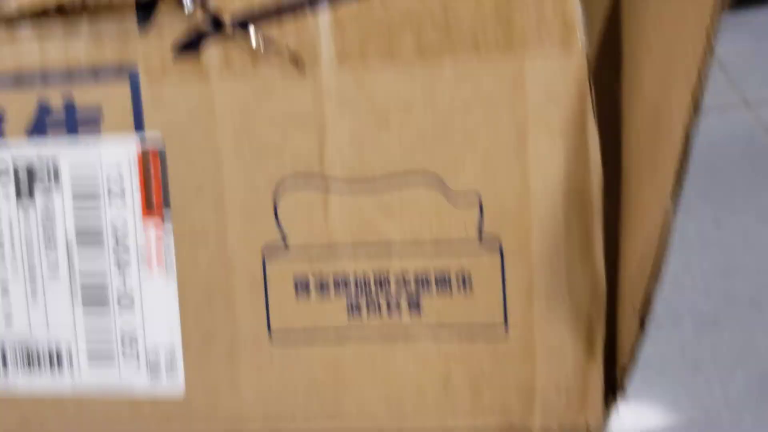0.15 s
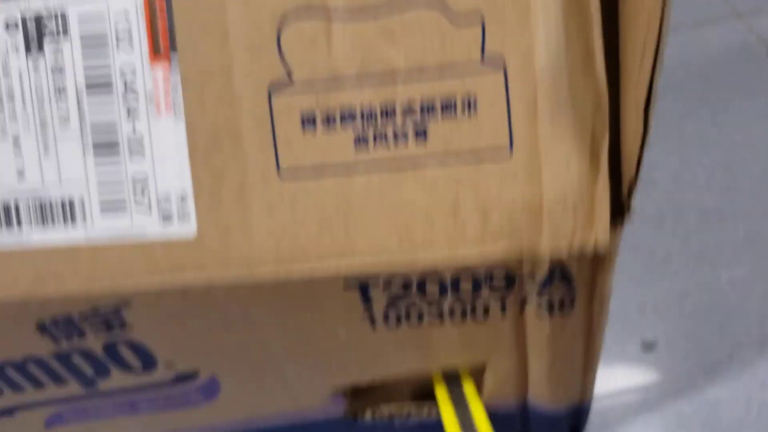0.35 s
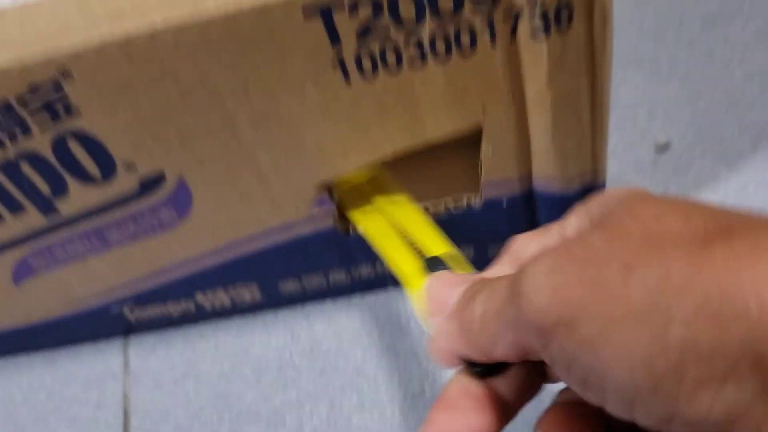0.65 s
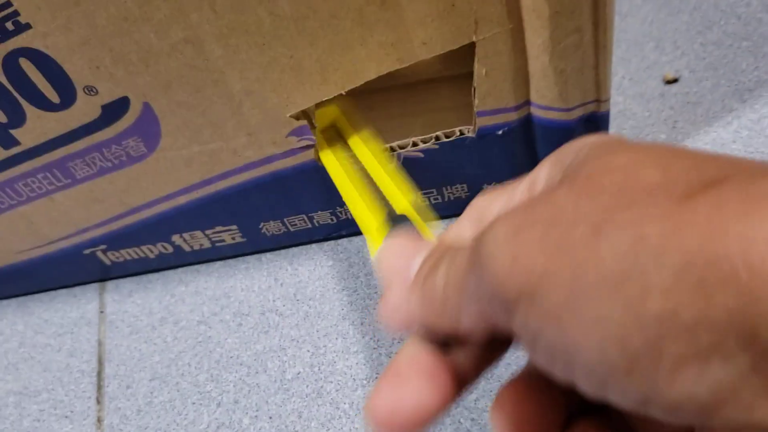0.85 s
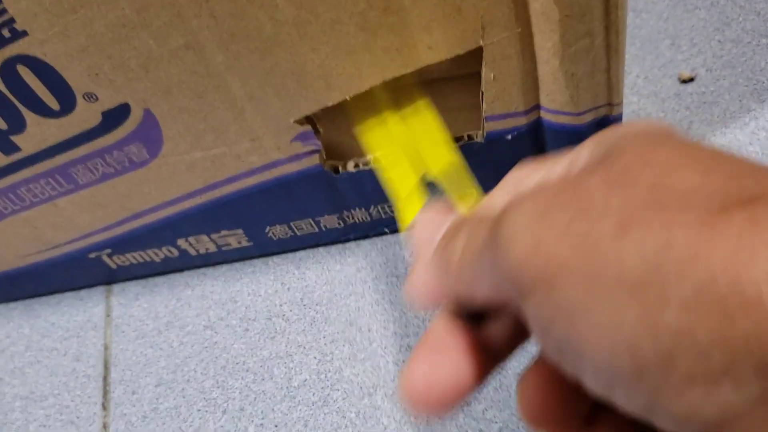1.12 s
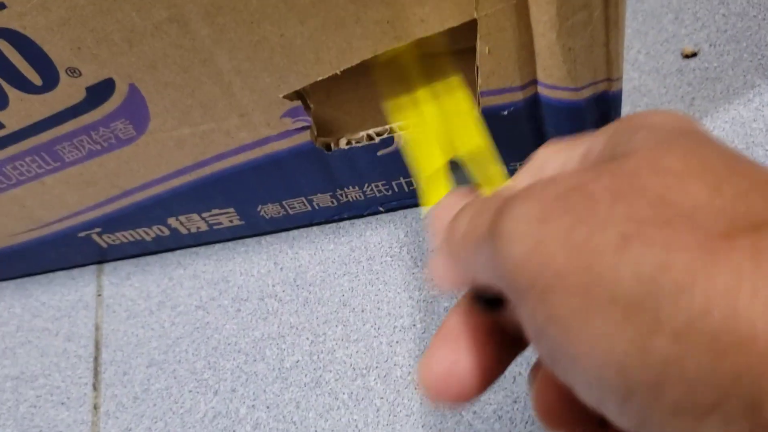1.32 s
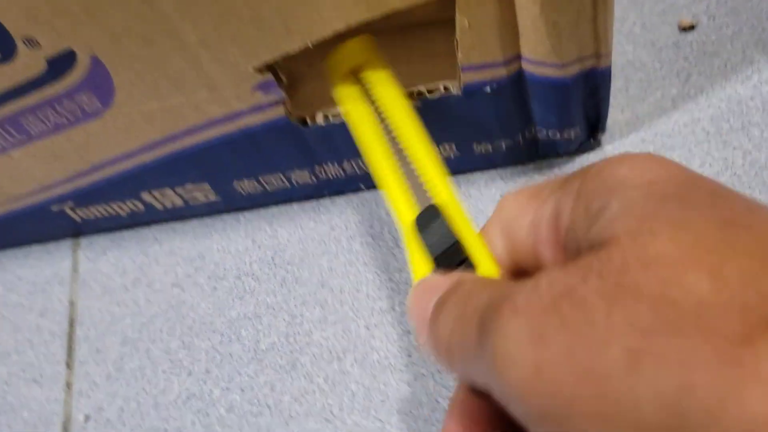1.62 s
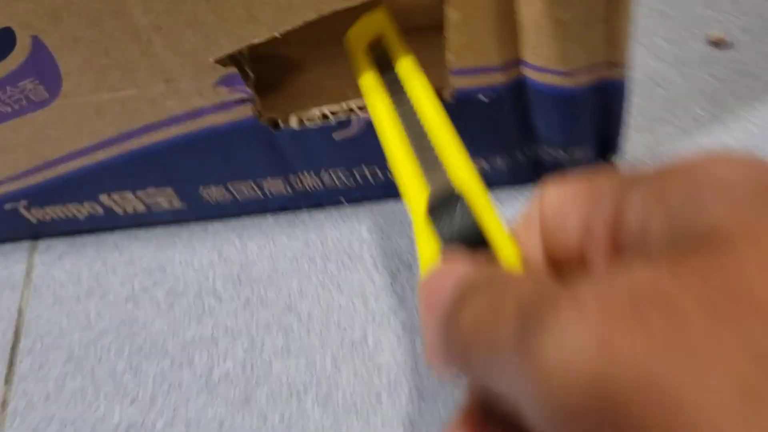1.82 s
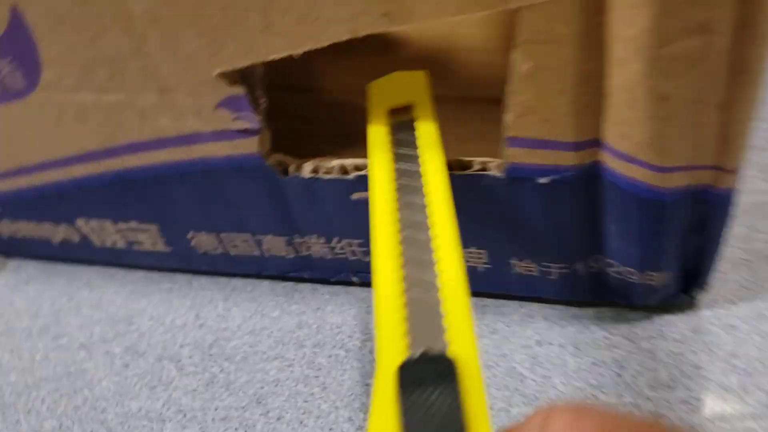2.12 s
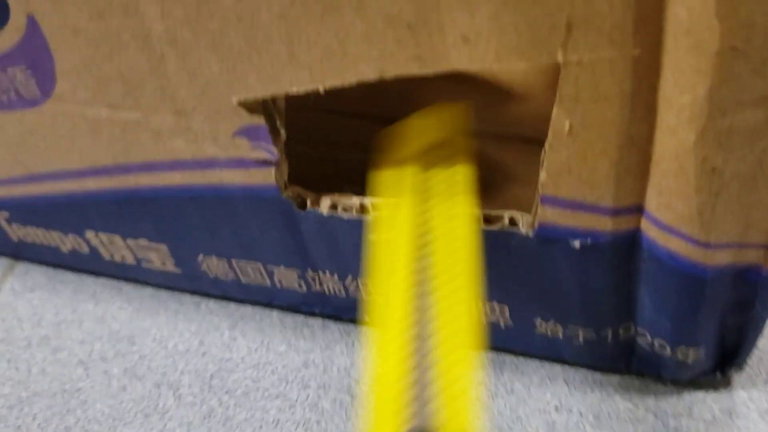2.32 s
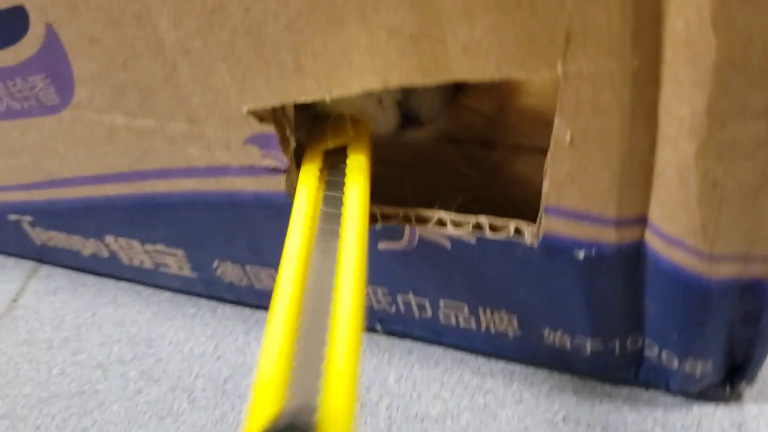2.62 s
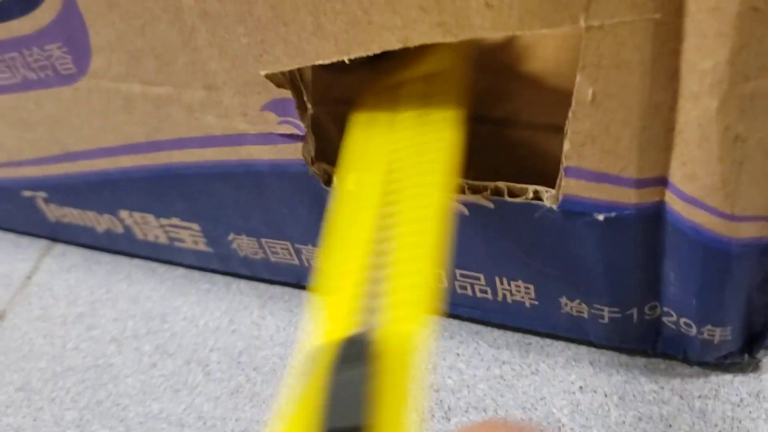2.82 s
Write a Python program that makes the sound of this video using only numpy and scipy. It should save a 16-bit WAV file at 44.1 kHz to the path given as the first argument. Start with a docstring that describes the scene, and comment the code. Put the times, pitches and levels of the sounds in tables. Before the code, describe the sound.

A plastic snap-off knife knocks irregularly on the edges of a hole in a cardboard box, each hollow thud topped by a bright rattling click; low handling rumble early, close phone microphone, small hard-walled room.

```python
"""Plastic knife knocking in a box

A plastic snap-off knife is waved about in a hole cut in a cardboard box and knocks on its edges, near a phone.
Each knock thuds as cavity, panel and edge modes driven by a short push and crushing corrugations.
Loose blade and slider click and chatter: noise bursts and ticks through handle and blade resonances.
A tiled room answers with decaying noise echoes; the moving phone rumbles at first, cardboard shuffles;
a faint hiss lies under it all. The last three are shaped noise."""
import sys
import numpy as np
from scipy import signal
from scipy.fft import rfft, irfft
from scipy.io import wavfile
from scipy.ndimage import uniform_filter1d

SR = 44100
rng = np.random.default_rng(int(sys.argv[2]) if len(sys.argv) > 2 else 0)


def store_pcm(level_fs):
    """Save levels as 16-bit WAV."""
    pcm = np.round(np.clip(level_fs, -1, 1) * 32767).astype(np.int16)
    wavfile.write(sys.argv[1], SR, np.atleast_2d(pcm).T)


N = 130095
PAD = SR // 10  # samples of lead-in, cut off after the echoes are made

# Knocks on the box; parts relative to the knock, before the part trims:
# (time [s], level [dB], cavity [dB], panels [dB], edge [dB],
#  boom pitch [Hz], favoured panel pitch [Hz], favoured edge pitch [Hz])
KNOCKS = [(0.174, -30, -21.5, -16.5, -18, 151, 288, 1060), (0.248, -36, -18, -15.5, -17.5, 171, 248, 705),
          (0.28, -39.5, -14.5, -14.5, -26, 177, 288, 680), (0.38, -33, -17, -11, -11, 166, 347, 840),
          (0.405, -38.5, -7, -12, -14, 148, 284, 643), (0.517, -36.5, -9, -26, -29, 172, 280, 633),
          (0.613, -32.5, -12.5, -8, -13.5, 167.4, 298, 680),
          (0.728, -19.5, -11.5, -16, -22.5, 166.4, 308, 660),
          (0.9165, -36, -0.5, -4.5, -13, 172.3, 306, 735), (0.927, -20.5, -17, -13.5, -32, 159, 326, 680),
          (1.135, -36.5, -8.5, -12, -28, 165, 254, 686), (1.275, -26, -6, -12, -19, 169, 236, 670),
          (1.397, -35, -16.5, -11, -8.5, 187, 310, 765), (1.471, -22.5, -8, -11.5, -19, 161, 227, 675),
          (1.657, -25, -8.5, -12.5, -22, 161.5, 257, 566), (1.677, -27, -8, -9, -22, 162, 310, 687),
          (1.767, -27.5, -14.5, -14.5, -16, 168.4, 300, 676),
          (1.868, -23, -13.5, -16.5, -17, 162.5, 248, 903), (2.117, -20.5, -19, -11.5, -8, 169, 290, 1176),
          (2.185, -36, -11, -18, -33, 137, 326, 1090), (2.281, -31.5, -9, -17.5, -36, 168.5, 240, 1110),
          (2.361, -27, -11, -14.5, -21.5, 155, 257, 630), (2.424, -19.5, -12, -16, -33, 164.2, 276, 1100),
          (2.623, -24.5, -9.5, -12.5, -23, 159.7, 294, 950),
          (2.75, -31.5, -16, -13.5, -22.5, 172.3, 243, 1370)]
# Knock before the start, still dying: columns of KNOCKS after the time
EARLIER_KNOCK = (-25, -17, -13.5, -12.5, 182.5, 320, 881)
# Box modes before retuning, scatter and late damping: (pitch [Hz], relative level [dB], t60 [s])
CAVITY_MODES = [(162.3, 6, 0.25), (181.2, 4, 0.076), (123, -7.5, 0.15)]
PANEL_MODES = [(266.8, 1.5, 0.065), (324.7, 1.5, 0.086), (228.6, -12.5, 0.12), (473, -5, 0.069)]
EDGE_MODES = [(580, -9, .025), (694, -2, .03), (780, -2, .03), (937, -3, .02), (1140, 1, .025),
              (1300, -2, .02), (1450, -4, .02)]
# Clicks of the loose blade and slider, before trim and limits:
# (time [s], peak [dB], handle share [dB], left minus right [dB], chatter [dB], chatter t60 [s])
CLICKS = [(0.1771, -10, -10, 3.5, -27, 0.025), (0.1806, -17, -3, 4, -29, 0.083),
          (0.1872, -28.5, 1, 1, -15.5, 0.23), (0.2842, -33, -3.5, 3, 1, 0.082),
          (0.3815, -11, -8, -1.5, -2, 0.06), (0.3925, -7, -12.5, 2, -12, 0.02),
          (0.531, -29.5, -11, 0, -5, 0.024), (0.6158, -10, -4.5, 2, -4.5, 0.039),
          (0.6253, -34, 7.5, -1, -3, 0.21), (0.7315, -4, -13, 5.5, -21, 0.05),
          (0.7336, -11, -20, -5, -14, 0.05), (0.7445, -19.5, -6.5, -3, -9, 0.067),
          (0.758, -21, -8, 4, -17, 0.046), (0.8217, -26, -3, 0, 1, 0.047),
          (0.827, -19, -18, -4, -28, 0.034), (0.886, -30, -28, 4, -10, 0.023),
          (0.9193, -7.5, -17, 0.5, -7, 0.081), (0.942, -27, -0.5, 3, -3, 0.13),
          (1.0293, -24, -9.5, 1.5, -3, 0.024), (1.1392, -20.5, -13.5, -1.5, 4, 0.028),
          (1.2105, -23, -18, -3.5, -19, 0.04), (1.2765, -16.5, -8.5, 1, -6, 0.061),
          (1.2808, -10.5, -9.5, -3, -9, 0.029), (1.4005, -11, -5, 5.5, -12.5, 0.043),
          (1.4705, -15, 0, 5, -5, 0.12), (1.4758, -10.5, -10, -7, -19, 0.057),
          (1.5815, -41, -9, -5, -6, 0.03), (1.5883, -32, -9, 2, -12, 0.024),
          (1.6588, -10, -7.5, 0.5, -8.5, 0.12), (1.6635, -11.5, -9.5, -1, -24, 0.066),
          (1.7675, -17.5, -2, -5.5, -12.5, 0.036), (1.7722, -4, -11, 0.5, 3, 0.038),
          (1.7817, -18.5, 4, -1.5, -13, 0.06), (1.8745, -18, -6, 2, -16.5, 0.061),
          (1.9026, -25.5, 4, 1, -15.5, 0.067), (2.118, -12.5, -6, 0, -12, 0.081),
          (2.1475, -17, -21, 0, -21, 0.023), (2.2795, -19, -13, 8, 1, 0.025),
          (2.2855, -10, -11.5, -1, -32, 0.017), (2.2882, -10.5, -11, -4, -18, 0.02),
          (2.3612, -17, -10.5, -3.5, 2, 0.048), (2.388, -22.5, 10, 0.5, -5, 0.14),
          (2.4268, -13.5, -9, -1.5, 0, 0.015), (2.545, -32.5, -7, -4, -2, 0.026),
          (2.6277, -9.5, -13, -2.5, -8.5, 0.023), (2.6712, -10.5, -6.5, -0.5, -3, 0.029),
          (2.7528, -22, -12, -2.5, -5, 0.045), (2.7625, -21, -5.5, -1, -26, 0.034)]
# Click before the start, chatter and echo still dying: columns of CLICKS after the time
EARLIER_CLICK = (-8, 2, 2.5, -30, 0.21)
# Knife resonances before scatter: (pitch [Hz], width [Hz], relative level [dB])
HANDLE_MODES = [(4210, 580, -2), (6150, 780, -14), (6897, 1180, 2.5), (1980, 4400, -4.5), (3380, 400, -22),
                (8700, 1500, -5)]
BLADE_MODES = [(10440, 1520, -7), (12585, 900, 7.5), (12130, 2400, -3), (14480, 2320, 4)]
# Handling rumble of the moving phone: (time [s], level [dB])
RUMBLE_LEVEL = [(0.0, -59), (0.31, -56), (0.5, -49), (0.62, -55), (0.8, -56), (1.04, -65.5), (1.58, -62),
                (2.05, -70.5), (2.59, -70), (2.95, -71)]
# Cardboard shuffling while the hand moves: (time [s], level [dB])
SHUFFLE_LEVEL = [(0.0, -42.5), (0.12, -57.5), (0.42, -48), (0.6, -54), (1.22, -63), (1.34, -47.5),
                 (1.66, -65), (1.96, -54), (2.1, -64), (2.31, -47), (2.55, -61), (2.8, -52.5),
                 (2.95, -69.5)]
# Hiss spectrum before scaling: (frequency [Hz], relative density [dB per Hz])
HISS_SPECTRUM = [(180, -15), (300, -5.5), (774, -21), (1040, -15), (1100, -6), (1230, -0.5), (3240, -29),
                 (6850, -14.5), (16000, -17.5)]
# Hiss: (time [s], level [dB])
HISS_LEVEL = [(0.0, -63), (0.88, -65.5), (1.09, -67), (1.7, -62), (1.99, -64.5), (2.37, -67), (2.95, -71)]
# Colour contrast of the two ports before scaling: (frequency [Hz], left against right [dB])
PORT_COLOUR = [(60, -2.5), (110, -5.5), (200, -1.5), (380, -6.5), (700, -5.5), (1290, 0), (2380, 1.5),
               (4400, -12), (8120, -7), (15000, 3.5)]

EARLIER_S = -.03
# Parts of the box: (modes, push width at half height [s], trim [dB], crush t60 [s],
# crush level [dB], ring build-up [s], octaves off the favoured pitch that cost 6 dB; None = retune to it)
BOX_PARTS = [
    (CAVITY_MODES, 0.00034, 11, 0.036, 3.5, 0.006, None),
    (PANEL_MODES, 0.0005, 10, 0.044, -2, 0.007, 0.52),
    (EDGE_MODES, 0.00026, 12.5, 0.0086, -1.5, 0.0015, 0.42),
]
MODE_SCATTER_DB, MODE_DETUNE_RATIO = 5, 0.04
DAMPED_S = 0.064  # ring dies ever faster
BOX_LOW_HZ = 100  # the box radiates little below

HANDLE_DB, CLICK_DB = 9, -0.5
CRACK_T60_S, CLICK_RISE_S, TICK_T60_S = .009, 0.00043, .004
CHATTER_PER_S, CHATTER_SPREAD_DB, CHATTER_TOP_DB = 1400, 4, -1.5
CHATTER_HOLD = 1.5  # exponent; over 1 holds at first, then stops short
COLOUR_SCATTER_DB, RING_DETUNE_RATIO = 1, 0.0038
UNALIKE_SHARE = 0.43  # share of crack noise power that differs left and right

ROOM_T60_S, ROOM_DELAY_S = 0.26, 0.0042
ROOM_ALIKE_HZ = 400  # echoes alike at both ports below
CLICK_ROOM_DB, BOX_ROOM_DB, BOX_ROOM_LOW_HZ = -11.5, -8.5, 300

# Widths are per pass of two resonance passes; flicker is before smoothing
RUMBLE_HZ, RUMBLE_WIDTH_HZ, RUMBLE_FLICKER_DB = 45, 45, 2.5
SHUFFLE_HZ, SHUFFLE_WIDTH_HZ, SHUFFLE_FLICKER_DB = 178, 230, 4
RUSTLE_HZ, RUSTLE_WIDTH_HZ, RUSTLE_DB = 770, 3300, -12  # dB relative to the shuffle
FLICKER_PER_S, SIDE_DB = 58, -12.5

HISS_LOW_POINT, HISS_SCALE = (100, -43.5), 0.94
LEFT_LATE_S, TOP_HZ = .0002, 15800
LEFT_COLOUR_SCALE, RIGHT_COLOUR_SCALE = 0.58, -0.32


def undb(db):
    """Amplitude ratio from dB."""
    return 10 ** (np.asarray(db) / 20)


def unit(x):
    """Scale to RMS 1."""
    return x / np.sqrt(np.mean(x ** 2))


def band(x, hz, width_hz):
    """Resonance with gain 1 at the centre."""
    b, a = signal.iirpeak(min(hz, .45 * SR), hz / width_hz, SR)
    return signal.lfilter(b, a, x)


def fade(t_s, t60_s):
    """Exponential decay from time 0, silent before."""
    return np.exp(-np.log(1000) * np.maximum(t_s, 0) / t60_s) * (t_s >= 0)


def colour(x, points, scale):
    """Shape the spectrum by scaled (Hz, dB) points on a log-frequency axis."""
    hz, db = np.array(points).T
    bins_hz = np.maximum(np.arange(N // 2 + 1) * SR / N, 1)
    gain_db = scale * np.interp(np.log(bins_hz), np.log(hz), db)
    return irfft(rfft(x) * undb(gain_db), N)


def follow(curve):
    """Amplitude along a (s, dB) curve."""
    time_s, db = np.array(curve).T
    return undb(np.interp(np.arange(N) / SR, time_s, db))


def add(out, start_s, x):
    """Mix x into the padded output, cut at its end."""
    i = PAD + int(start_s * SR)
    k = min(x.shape[-1], out.shape[-1] - i)
    out[..., i:i + k] += x[..., :k]


def mode_ring(modes, pitch_hz, swell_s, spread_oct, t_s):
    """Damped sines: cavity retuned to the knock, other modes favoured near its pitch and scattered."""
    hz, mode_db, t60_s = np.array(modes).T[:, :, None]
    level_luck, pitch_luck = rng.standard_normal((2, len(modes), 1))
    if spread_oct is None:
        hz = hz * pitch_hz / hz[0]
    else:
        mode_db = mode_db - 6 * (np.log2(hz / pitch_hz) / spread_oct) ** 2
        hz = hz * (1 + MODE_DETUNE_RATIO * pitch_luck)
    gain = undb(mode_db + MODE_SCATTER_DB * level_luck)
    ring = (gain * fade(t_s, t60_s) * np.sin(2 * np.pi * hz * t_s)).sum(0)
    return ring * (1 - np.exp(-t_s / swell_s)) * np.exp(-(t_s / DAMPED_S) ** 2)


def push_and_crush(push_s, crush_t60_s, crush_db, t_s):
    """A brief push; corrugations then crush as decaying noise and go on driving the modes."""
    decay = fade(t_s[:SR // 20], crush_t60_s)
    force = rng.standard_normal(len(decay)) * decay
    force *= undb(crush_db) / np.sqrt(np.sum(decay ** 2))
    force[0] += 1.
    return np.convolve(force, np.hanning(int(2 * push_s * SR) + 3))


def box():
    """Every knock drives cavity, panel and edge modes; each lands a little differently."""
    out, t_s = np.zeros(N + PAD), np.arange(SR // 4) / SR
    for start_s, db, *columns in [(EARLIER_S, *EARLIER_KNOCK)] + list(KNOCKS):
        for part, part_db, pitch_hz in zip(BOX_PARTS, columns[:3], columns[3:]):
            modes, push_s, trim_db, crush_t60_s, crush_db, swell_s, spread_oct = part
            ring = mode_ring(modes, pitch_hz, swell_s, spread_oct, t_s)
            force = push_and_crush(push_s, crush_t60_s, crush_db, t_s)
            thud = signal.fftconvolve(ring, force)
            add(out, start_s, undb(db + part_db + trim_db) * thud / np.abs(thud).max())
    high_pass = signal.butter(2, BOX_LOW_HZ, "high", fs=SR, output="sos")
    return signal.sosfilt(high_pass, out)


def rattle(chatter_envelope, t_s):
    """Stereo noise: one crack, then random ticks of the loose blade."""
    when = rng.random(len(t_s))
    size = np.clip(rng.standard_normal(len(t_s)), -2, 2)
    ticks = (when < CHATTER_PER_S / SR) * undb(CHATTER_SPREAD_DB * size) * chatter_envelope
    tick = fade(t_s[:SR // 50], TICK_T60_S)
    chatter = signal.fftconvolve(ticks, tick)[:len(t_s)]
    crack = fade(t_s, CRACK_T60_S) * (1 - np.exp(-t_s / CLICK_RISE_S))
    noise = rng.standard_normal((3, len(t_s)))
    stereo = np.sqrt(1 - UNALIKE_SHARE) * noise[0] + np.sqrt(UNALIKE_SHARE) * noise[1:]
    return (crack + chatter) * stereo


def knife():
    """Handle and blade each ring to their own rattle, in which the chatter holds a moment and dies."""
    out, t_s = np.zeros((2, N + PAD)), np.arange(SR // 5) / SR
    for start_s, db, handle_db, pan_db, chatter_db, t60_s in [(EARLIER_S, *EARLIER_CLICK)] + list(CLICKS):
        dying_db = -60 * (t_s / max(t60_s, .01)) ** CHATTER_HOLD
        envelope = undb(min(chatter_db, CHATTER_TOP_DB) + dying_db)
        click = np.zeros((2, len(t_s)))
        for modes, body_db in ((HANDLE_MODES, HANDLE_DB + handle_db), (BLADE_MODES, 0)):
            drive = rattle(envelope, t_s)
            for hz, width_hz, mode_db in modes:
                level_luck, pitch_luck = rng.standard_normal(2)
                gain = undb(body_db + mode_db + COLOUR_SCATTER_DB * level_luck)
                click += gain * band(drive, hz * (1 + RING_DETUNE_RATIO * pitch_luck), width_hz)
        sides_db = np.array([[pan_db], [-pan_db]]) / 2
        add(out, start_s, click / np.abs(click).max() * undb(db + CLICK_DB + sides_db))
    return out


def room(x):
    """Dense echoes of hard walls as decaying noise, different at each port except in the bass."""
    t_s = np.arange(SR // 2) / SR
    mid, side = rng.standard_normal((2, len(t_s)))
    b, a = signal.butter(2, ROOM_ALIKE_HZ, "high", fs=SR)
    side = signal.lfilter(b, a, side)
    echo = np.array([mid + side, mid - side]) * fade(t_s - ROOM_DELAY_S, ROOM_T60_S)
    echo /= np.sqrt(np.sum(echo ** 2) / 2)
    return signal.fftconvolve(x, echo, axes=1)[:, :N + PAD]


def drone(curve, hz, width_hz, flicker_db):
    """Flickering noise in one broad resonance on a level curve, nearly alike left and right."""
    mid, side = band(band(rng.standard_normal((2, N)), hz, width_hz), hz, width_hz)
    k = int(SR / FLICKER_PER_S)
    steps = np.repeat(rng.standard_normal(N // 100), k)[:N]
    flicker = undb(flicker_db * uniform_filter1d(steps, k))
    stereo = mid + undb(SIDE_DB) * np.array([side, -side])
    return unit(flicker * stereo) * follow(curve)


def rumble():
    """The moving phone's handling rumble: flickering low noise."""
    return drone(RUMBLE_LEVEL, RUMBLE_HZ, RUMBLE_WIDTH_HZ, RUMBLE_FLICKER_DB)


def shuffle():
    """Cardboard shuffling plus fibres rubbing: two noise bands on one level curve."""
    body = drone(SHUFFLE_LEVEL, SHUFFLE_HZ, SHUFFLE_WIDTH_HZ, SHUFFLE_FLICKER_DB)
    rustle = drone(SHUFFLE_LEVEL, RUSTLE_HZ, RUSTLE_WIDTH_HZ, SHUFFLE_FLICKER_DB)
    return body + undb(RUSTLE_DB) * rustle


def hiss():
    """Independent left and right noise, spectrally shaped, on a slow level curve."""
    noise = rng.standard_normal((2, N))
    return unit(colour(noise, [HISS_LOW_POINT] + list(HISS_SPECTRUM), HISS_SCALE)) * follow(HISS_LEVEL)


def scene():
    """Knocks and clicks with their echoes, over hand noise and hiss."""
    thuds, clicks = box() * np.ones((2, 1)), knife()
    b, a = signal.butter(1, BOX_ROOM_LOW_HZ, "high", fs=SR)
    thin = signal.lfilter(b, a, thuds)  # the boom stays near the box
    echoes = room(undb(CLICK_ROOM_DB) * clicks + undb(BOX_ROOM_DB) * thin)
    knocking = thuds + clicks + echoes
    return knocking[:, PAD:] + rumble() + shuffle() + hiss()


def record(dry):
    """Two ports of unlike colour, the left a little later; the top is cut."""
    late = int(LEFT_LATE_S * SR)
    left = colour(dry[0], PORT_COLOUR, LEFT_COLOUR_SCALE)
    left = np.concatenate([np.zeros(late), left[:N - late]])
    right = colour(dry[1], PORT_COLOUR, RIGHT_COLOUR_SCALE)
    low_pass = signal.ellip(10, .5, 85, TOP_HZ, fs=SR, output="sos")
    return signal.sosfilt(low_pass, np.array([left, right]))


dry = scene()
out = record(dry)
store_pcm(out)
```